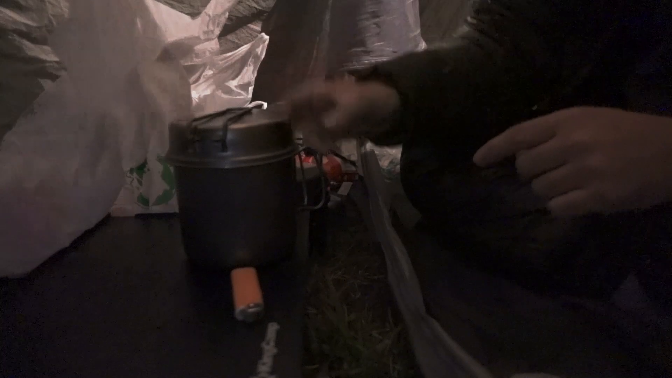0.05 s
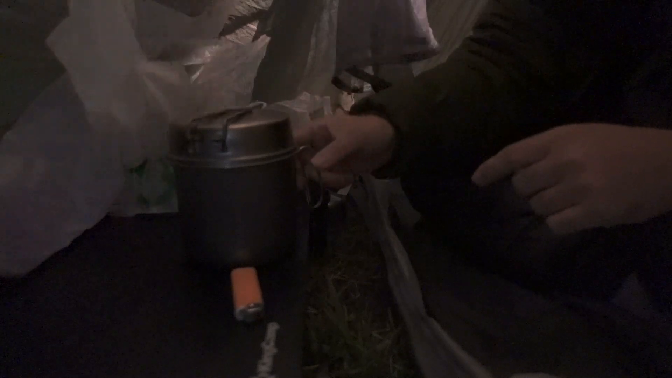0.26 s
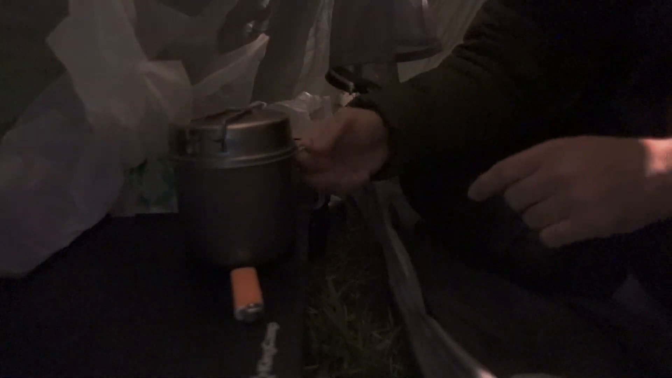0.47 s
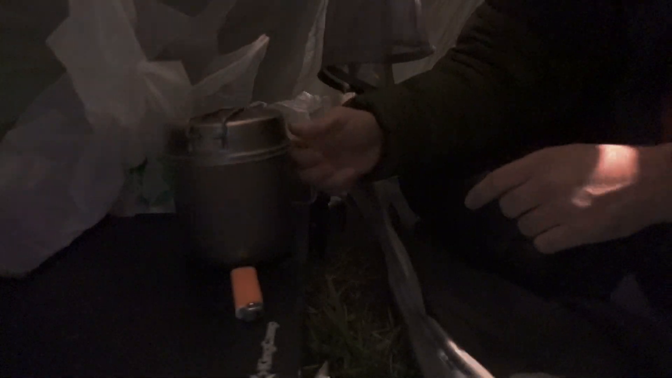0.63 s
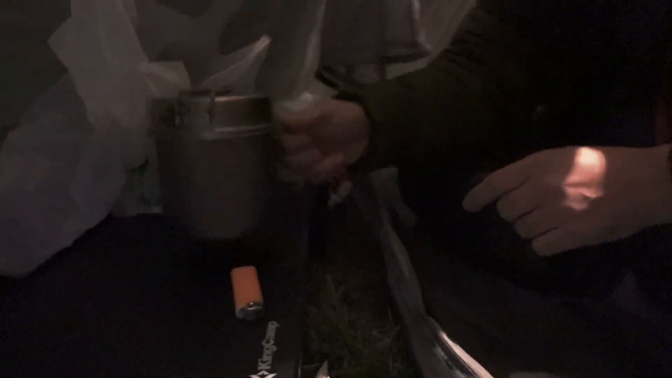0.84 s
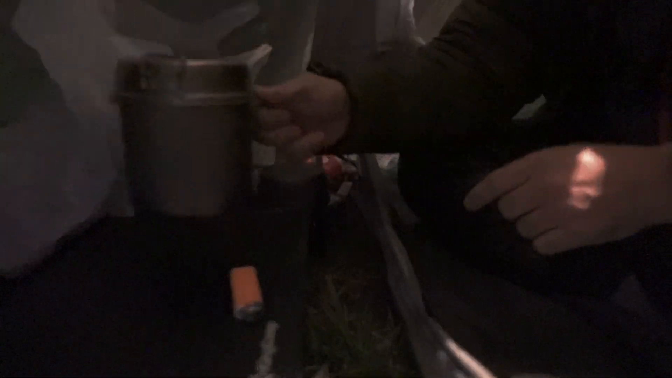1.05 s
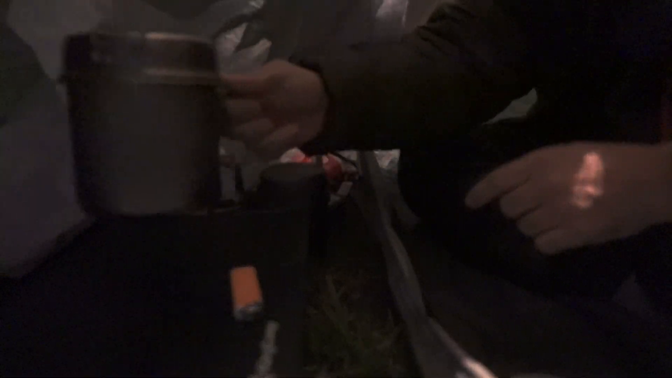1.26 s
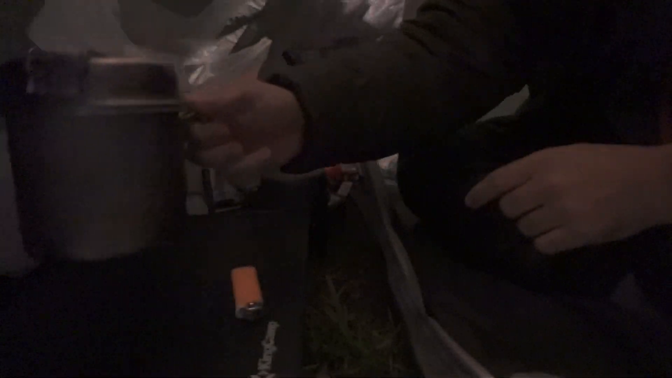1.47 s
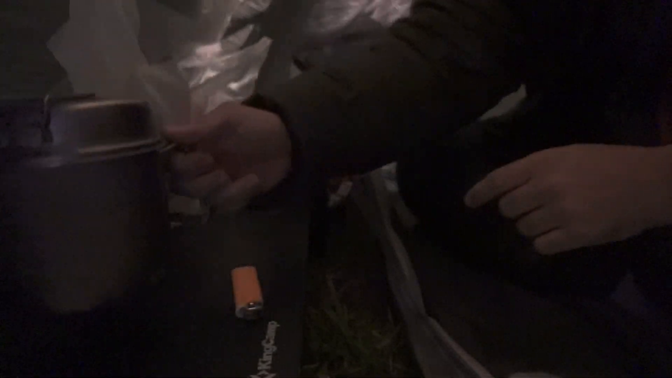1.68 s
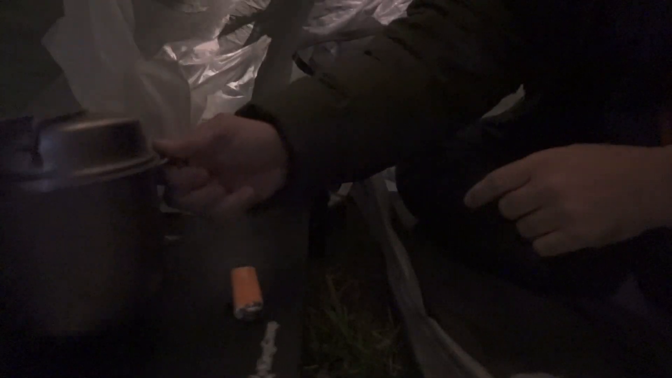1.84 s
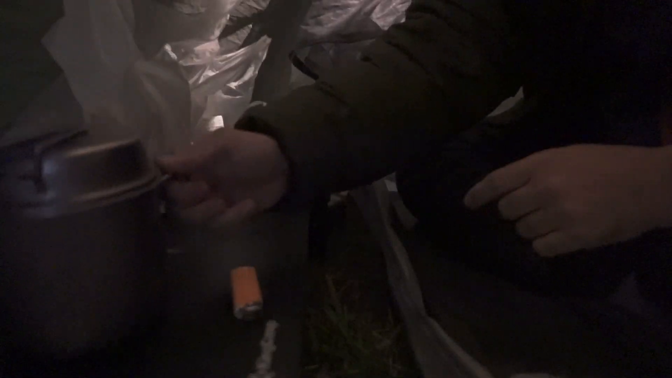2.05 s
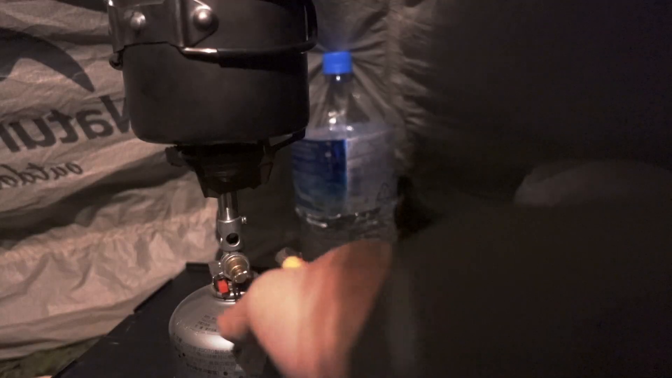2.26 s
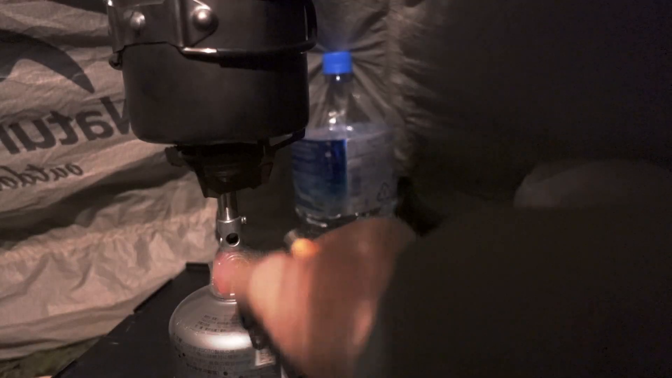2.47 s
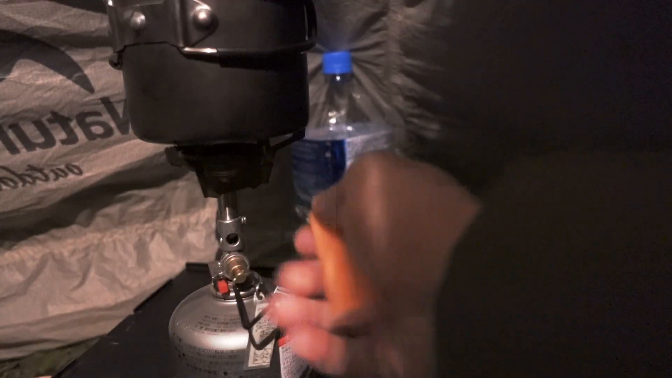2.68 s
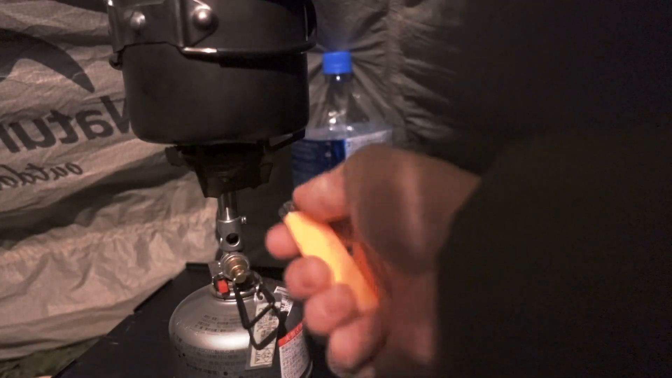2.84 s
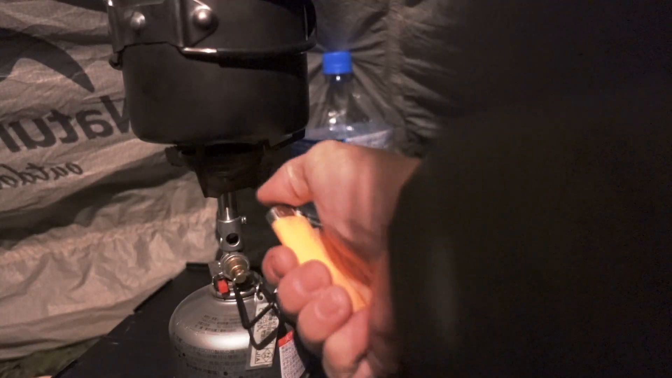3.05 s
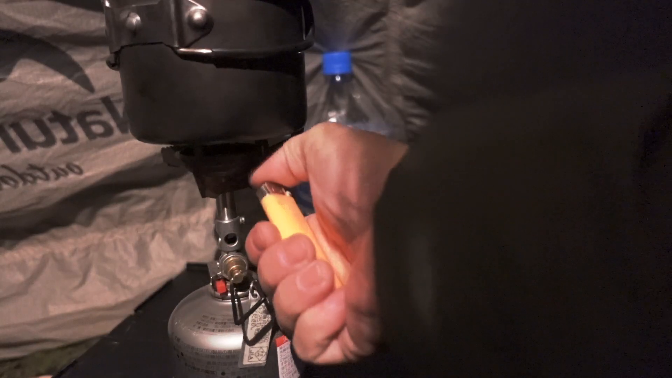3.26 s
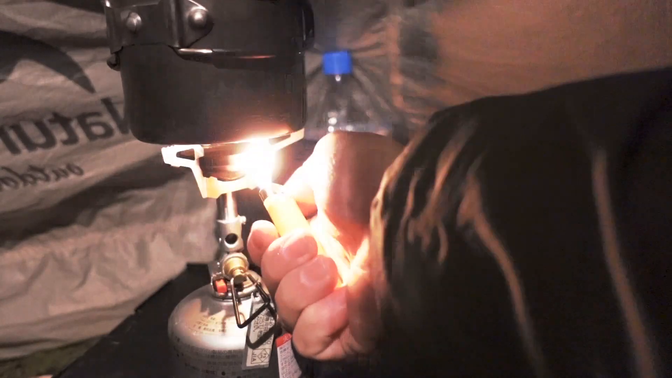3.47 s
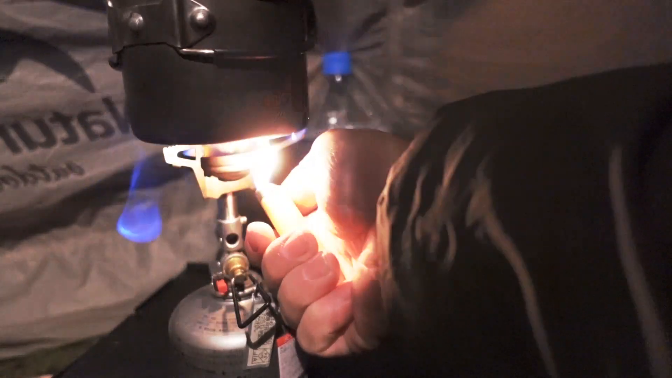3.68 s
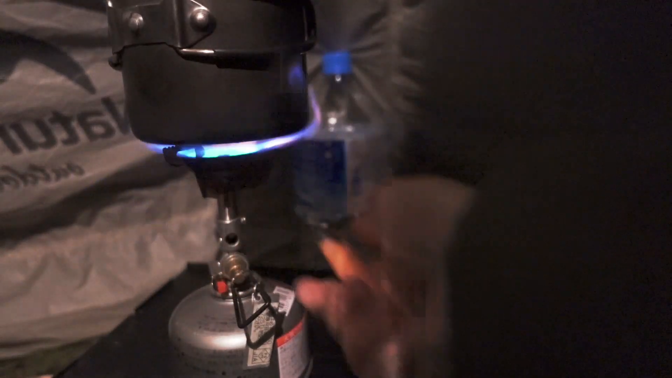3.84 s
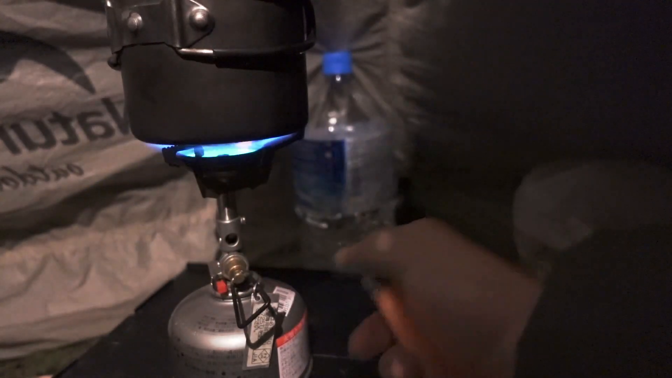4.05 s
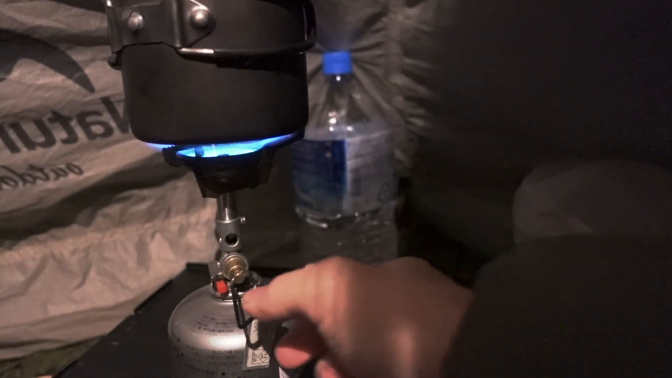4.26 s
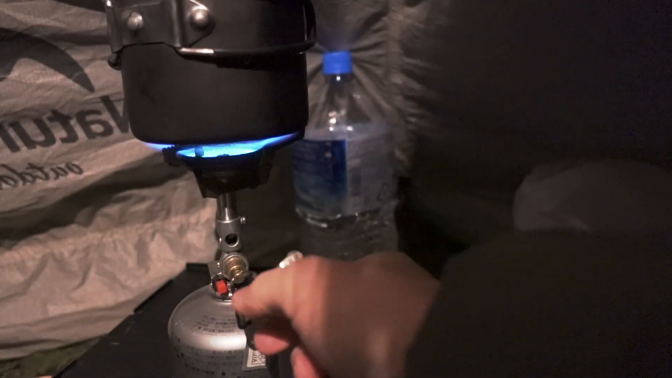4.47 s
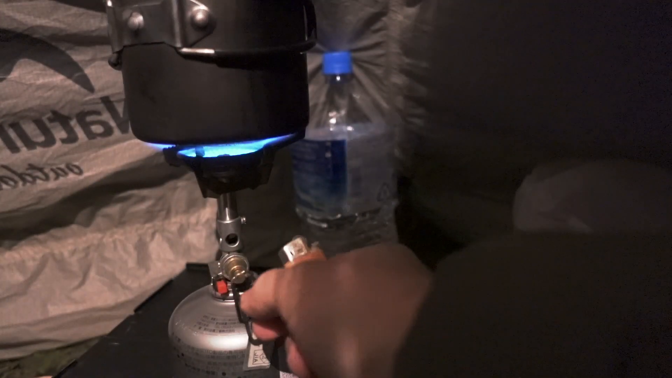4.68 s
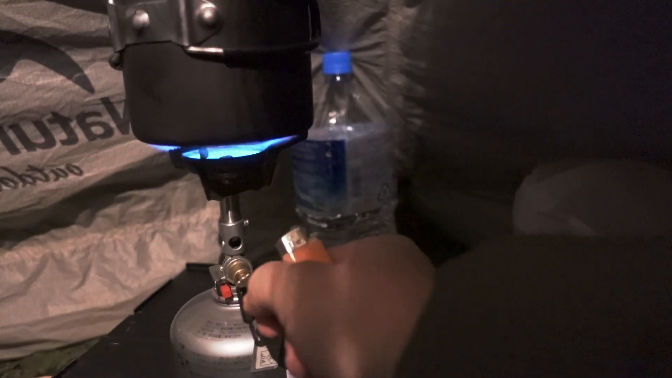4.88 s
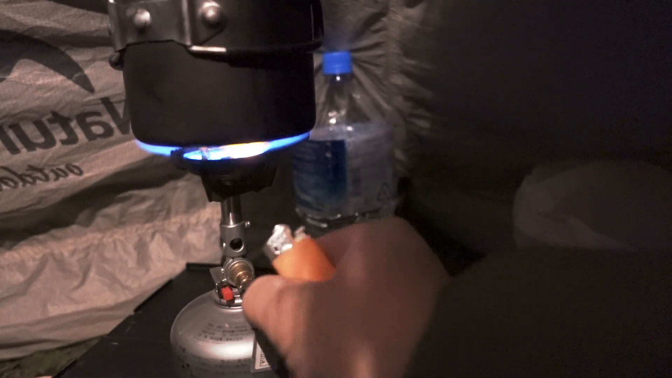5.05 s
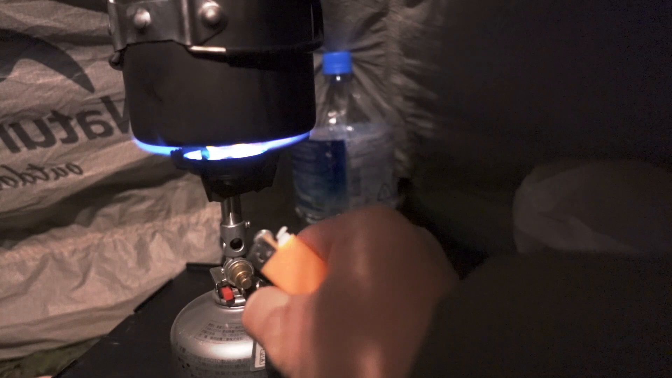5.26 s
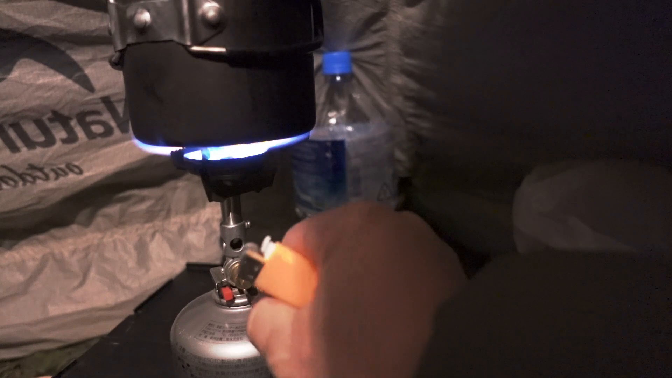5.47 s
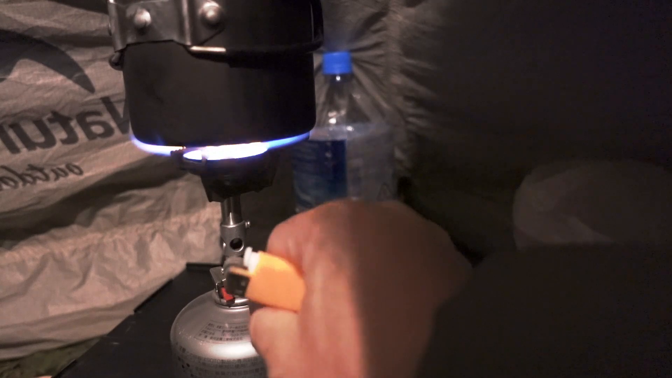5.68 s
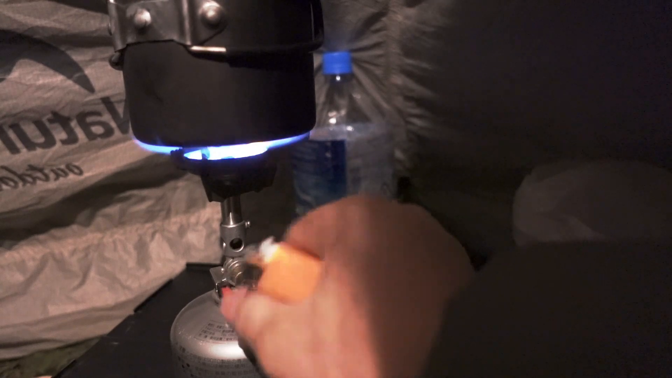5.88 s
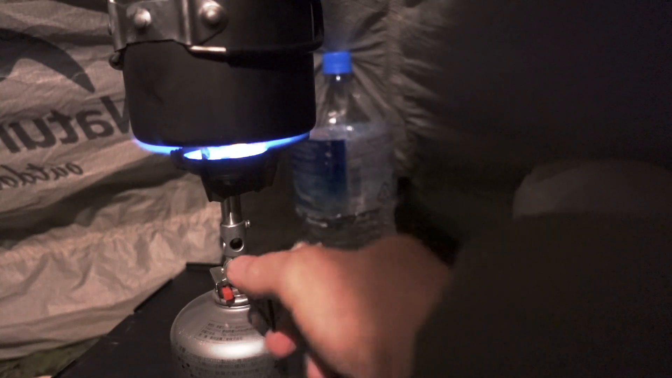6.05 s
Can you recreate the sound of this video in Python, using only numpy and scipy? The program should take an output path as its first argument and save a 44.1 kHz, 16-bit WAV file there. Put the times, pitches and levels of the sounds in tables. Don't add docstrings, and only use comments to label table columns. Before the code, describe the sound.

Pot dragged, lifted and knocked down in a tent, then close by a camp stove hisses, is lit with soft low pops, and its key grinds.

```python
import sys
import numpy as np
from scipy import signal
from scipy.fft import irfft
from scipy.io import wavfile
from scipy.ndimage import uniform_filter1d, map_coordinates

SR = 44100
rng = np.random.default_rng(int(sys.argv[2]) if len(sys.argv) > 2 else 0)


def level_to_linear(level):
    exponent = np.asarray(level, float) / 20
    return 10 ** exponent


def store_wav(level_fs):
    pcm = np.round(np.clip(np.atleast_2d(level_fs), -1, 1) * 32767)
    wavfile.write(sys.argv[1], SR, pcm.T.astype(np.int16))


N = 269892
TIME = np.arange(N) / SR
NEAR_S = 2.13
LAND_S = 2.0792

# time in seconds, level in dB.
AIR_LEVEL = [(0, -45), (1.9, -43.5), (2.27, -36.5), (2.86, -35), (5.9, -35), (6.12, -32)]
# frequency in Hz, level in dB per Hz.
RUMBLE_COLOURS = [
    [(20, -53), (35, -37), (60, -12.5), (120, 0.5), (213, 0), (300, -0.5), (420, -11), (500, -6.5),
     (650, -13.5), (800, -22), (1100, -37), (2000, -100)],
    [(15, -94), (25, -57), (32, -57), (45, -30.5), (116, -7.5), (186, 0), (241, -4), (308, -14),
     (433, -14.5), (579, -16), (638, -15.5), (1200, -39), (1560, -58), (2640, -120)],
]
WASH_DB = [2.5, -1.5]
# frequency in Hz, level in dB per Hz.
STILL_COLOURS = [
    [(470, -23), (800, -5), (1840, 1.5), (2630, -3.5), (3020, -9), (8420, -5), (15300, -13), (16500, -32)],
    [(530, -35), (900, -7.5), (1030, -3), (1740, -0.5), (2060, -5.5), (2270, -3.5), (15100, -13),
     (16500, -26)],
]
STILL_DB = [-53.5, -52.5]
# frequency in Hz, side minus mid in dB.
RUMBLE_SIDE = [(60, -34), (150, -34.5), (380, -11), (950, -4.5), (2380, 33), (5980, -1), (15000, -3)]
# start in seconds, length in seconds, share in dB, rise and fall in seconds.
HAND_SHADE = (4.3, .5, -7, .3, .03)
# centre in seconds, length in seconds, level in dB, pitch in Hz.
HOLLOWS = [(0.84, 0.42, -48.5, 1150), (5.008, 0.047, -47, 4600), (0.901, 0.13, -37, 5204),
           (1.169, 0.2, -31.5, 9350), (1.55, 0.45, -50, 1325), (2.912, 0.065, -45, 3560),
           (3.686, .024, -39, 5600), (4.36, .2, -51, 8440), (4.48, 0.24, -55, 1570), (4.48, .24, -60, 2600),
           (5.853, 0.53, -53, 1380), (5.62, .7, -56, 3800), (5.3, .4, -60, 2550)]
# centre in seconds, length in seconds, level
# in dB, pitch in Hz.
BRUSHES = [(0.464, 0.08, -49, 700), (0.964, 0.047, -34.5, 6440), (1.124, 0.037, -39, 3400),
           (1.304, .024, -35, 8000), (1.341, .03, -36, 6500), (1.527, .012, -36, 12000),
           (1.203, 0.025, -28.5, 4900), (1.466, 0.013, -28, 4600), (1.468, 0.031, -23.5, 8450),
           (2.185, 0.03, -53, 5600), (2.092, .036, -36, 11500), (2.14, 0.066, -50, 9500),
           (2.922, .05, -48, 7840), (3.272, 0.045, -44, 6100), (3.095, 0.026, -50, 8000),
           (3.242, .03, -47, 8000), (3.93, 0.43, -50, 9000), (4.08, 0.52, -61, 6940),
           (3.5, 0.057, -37, 9000), (3.587, 0.019, -35, 5000), (3.686, 0.049, -38, 5600),
           (3.683, 0.03, -37, 1270), (3.684, 0.015, -29.5, 640), (3.698, 0.06, -41, 8900)]
# time in seconds, level in dB.
RUSTLE_LEVEL = [(.89, -43.5), (1.0, -35.5), (1.088, -34), (1.097, -27), (1.208, -31.5), (1.225, -36),
                (1.36, -37.5), (1.495, -43), (1.56, -42), (1.95, -65.5)]
# frequency in Hz, level in dB per Hz.
CLOTH_COLOUR = [(530, -15.5), (900, -6), (1300, -5.5), (1910, -7), (5380, -0.5), (7290, 5), (9530, 4.5),
                (15100, -4), (15900, -8), (16500, -16)]
# time in seconds, peak in dB, ring in Hz, 60 dB decay in seconds.
LATCH_SNAPS = [
    (0.3487, -8, 5000, 0.11),
    (0.351, -4, 9400, 0.12),
    (4.798, -29, 7900, 0.094),
    (4.9141, -4, 8600, 0.035),
    (4.9175, -11, 8400, 0.044),
]
# time in seconds, peak in dB, ring in Hz, dull part in dB.
LIFT_TICKS = [(0.9547, -27, 6640, -28), (0.9978, -12.5, 7850, -27), (1.0066, -15, 7400, -17),
              (1.0261, -6.5, 7050, -16), (1.046, -13, 9100, -25), (1.0956, -15, 7000, -19),
              (1.28, -25, 7700, -31), (1.298, -10.5, 9400, -14), (1.302, -23, 7500, -20),
              (1.3066, -14.5, 5940, -22), (1.33, -15.5, 6010, -22), (1.334, -25, 8000, -25),
              (1.339, -18, 6860, -15), (1.3445, -18, 5500, -12), (1.352, -21, 6400, -25),
              (1.415, -25, 6080, -20), (1.4477, -23, 7560, -17), (1.3779, -10, 7940, -21),
              (1.3797, -5, 8400, -14), (1.4632, -14, 4570, -35), (1.512, -21, 6190, -31),
              (1.529, -13.5, 5100, -39), (1.529, -14, 9100, -39), (1.5421, -9, 6300, -39),
              (1.7875, -18, 5660, -12.5)]
# time in seconds, peak in dB, ring in Hz, dull part in dB,
# top in dB.
HAND_TICKS = [(2.508, -38, 2660, -1, -21), (2.895, -33, 4000, -20, -25), (2.9043, -26.5, 3900, -12, -14),
              (2.909, -30, 3330, -10, -22), (2.917, -35, 3250, -9, -28), (2.925, -30, 4500, -8, -14),
              (3.089, -35, 6500, -15, -5), (3.2355, -37, 6060, -6, -3), (3.2645, -32, 6650, -1, -16),
              (3.271, -35, 5900, 0, -18), (3.4025, -36, 2600, -4, -30), (3.409, -26.5, 3100, -9, -19),
              (3.417, -29.5, 3200, -15, -29), (3.4518, -34, 6160, -22, -23), (3.4578, -21, 8010, -30, -21),
              (3.4648, -19, 8290, -20, -14), (3.47, -16, 8060, -19, -18), (3.477, -11, 7400, -22, -8),
              (3.481, -4.5, 8550, -18, -6), (3.5675, -16.5, 2640, 2, -24), (3.5832, -19.5, 2850, 3, -14),
              (3.6752, -22.5, 4500, -27, -27), (3.792, -28, 5000, -3, -8), (4.77, -37, 7570, -20, -21),
              (4.8411, -31, 8120, -12, -15), (4.998, -22, 7560, -10, -17), (5.012, -24, 7400, -12, -15),
              (5.045, -33, 4200, -8, -7), (5.8152, -38, 5080, -23, -28)]
# time in seconds, peak
# in dB, ring in Hz, dull part in dB, # top in dB.
CRACKLES = [(1.119, -14, 5600, -10, -14), (1.1315, -18, 9800, -22, 2), (1.165, -17, 9400, -25, -10),
            (1.194, -17, 7490, -12, -12), (1.6067, -31, 3390, -10, -20), (1.905, -43, 8500, -25, -10),
            (1.941, -42, 8000, -25, -12), (1.9853, -40, 7900, -25, -10), (2.0853, -19, 6000, -11, -12),
            (2.0985, -22, 6500, -10, -8), (2.1809, -34, 6800, -4, -10), (3.508, -31, 9000, -25, -14),
            (4.8756, -23, 8100, -12, -11), (4.9679, -27, 3920, -10, -6), (4.994, -29, 4700, -14, -14),
            (5.037, -34, 9000, -20, -8), (5.056, -28, 8300, -20, -8)]
# time in seconds, level in dB, pitch in Hz, 60 dB decay in seconds.
PINGS = [(2.181, -43, 6800, .03), (2.184, -43, 2730, .05), (2.19, -47, 5600, .04), (4.771, -43, 7570, .12),
         (4.798, -33, 7590, .06), (4.9135, -18, 7170, .04), (4.9142, -23, 9300, .03),
         (5.011, -33, 7600, .05), (5.8152, -39, 5080, .04), (4.914, -25, 545, .06),
         (3.4095, -38, 3100, .03), (3.418, -38, 3250, .035), (2.908, -38, 3330, .03)]
# start in seconds, length in seconds, level in dB.
PULLS = [
    (-.1, 0.98, -26.5),
    (-.1, 0.46, -27.5),
    (0.471, 0.472, -26),
]
# frequency in Hz, level in dB per Hz.
POT_COLOUR = [(530, -78), (900, -30.5), (1150, -29.5), (1540, -25.5), (2380, -11), (2820, -12.5),
              (3150, -13.5), (4760, -13), (5930, -1.5), (8540, -18.5), (14900, -25), (15900, -26),
              (16500, -65)]
# frequency in Hz, width in Hz, lift in dB, lift in dB as the pull slackens.
POT_MODES = [(1150, 120, 2, 8), (2385, 120, 7, 13), (2810, 230, 11.5, 9), (3430, 200, 9, 8),
             (3880, 120, -6, -4), (4500, 120, 2.5, 4), (4900, 130, -8, -8), (5025, 110, 8.5, 5),
             (5340, 110, 5.5, 13), (5600, 130, 4.5, 4), (5873, 100, 8.5, 0), (6160, 180, 5, -4),
             (7050, 220, 5, -5), (7400, 89, 1, -4)]
# time in seconds, pitch ratio.
POT_BEND = [(0, 0.98), (.25, 1.008), (.4, 1), (.65, 1.012), (.86, 1.003), (.93, 0.94)]
# frequency in Hz, level in dB per Hz.
LANDING_COLOUR = [(120, -25), (200, -8), (361, -32), (513, 1), (908, -13), (1200, -11.5), (2080, -11.5),
                  (2240, -15), (3130, -15.5), (4440, -10.5), (7450, -12.5), (13700, -23.5), (16500, -67)]
# frequency in Hz, level in dB, 60 dB decay in seconds.
LANDING_MODES = [(250, 1.5, 0.083), (542, 7, 0.03), (502, -3, 0.16), (700, -2, 0.097), (1220, -32, 0.11),
                 (1554, -7, 0.07), (2280, -10.5, 0.23), (3670, -6, 0.11), (4430, -11, 0.33),
                 (5100, -6, 0.16), (6000, -2, 0.11), (7666, -24, 0.19), (8301, -21, .08)]
# time in seconds, level in dB.
KEY_PRESSURE = [(4.765, -50), (4.81, -41.5), (4.86, -32.5), (4.905, -35.5), (4.925, -33.5), (4.975, -35),
                (5.01, -38), (5.06, -41.5), (5.13, -54)]
# frequency in Hz, level in dB per Hz.
CANISTER_COLOUR = [(210, -42.5), (350, -11), (635, -8.5), (877, -19.5), (1060, -13.5), (1640, -27.5),
                   (3030, -17.5), (3620, -20.5), (3990, -17.5), (7850, -13), (15200, -26), (16500, -67)]
# frequency in Hz, width in Hz, lift in dB.
CANISTER_MODES = [(536, 12, 11), (581, 18, 6), (631, 23, 8), (1015, 20, 12), (1086, 20, 11.5),
                  (1446, 70, 7), (2405, 57, 9.5), (3105, 110, 10), (4030, 63, 12.5), (4600, 53, 14),
                  (6340, 90, 9), (6830, 120, 6), (7570, 100, 6), (8200, 110, 9)]
# frequency in Hz, level in dB per Hz.
WHEEL_COLOUR = [(530, -69), (900, -40), (1480, -25), (2660, -12), (3150, -4.5), (5380, -21.5), (7200, 3),
                (7840, -8), (9880, -1), (12900, -22), (14900, -24), (15900, -20), (16500, -51)]
# time in seconds, peak in dB, pitch in Hz, 60 dB decay in seconds, rough edge in dB.
POPS = [
    (3.5682, -13, 226, 0.041, -22),
    (3.582, -6, 181, 0.047, -20),
    (3.593, -18, 100, 0.066, -40),
    (3.683, 2, 189, 0.03, -27),
]
# time in seconds, level in dB.
GAS_FLOW = [(2.3, -59), (2.4, -57), (2.9, -48), (3.2, -52.5), (3.5, -53), (3.75, -51.5), (3.9, -51),
            (4.15, -52), (4.45, -52.5), (4.77, -55.5), (5.2, -50), (5.4, -50), (5.6, -46.5), (5.85, -48),
            (6.12, -47)]
# frequency in Hz, level in dB per Hz.
JET_COLOURS = [
    [(530, -28), (900, -14), (1230, -31), (2620, -12.5), (6860, -10), (7650, -4), (8330, -8.5),
     (11300, -5.5), (15700, -16), (16500, -32)],
    [(530, -38), (900, -19), (1360, -39), (1590, -23), (2110, -22.5), (5720, -28.5), (8330, -24),
     (15100, -31), (15900, -26), (16500, -54)],
    [(530, -33), (900, -1), (1390, -6), (1740, -10.5), (2960, -11.5), (3780, -4.5), (4430, -5.5),
     (10200, -4), (15500, -17), (16500, -24)],
]
# frequency in Hz, width in Hz, lift in dB.
JET_MODES = [
    [(2640, 140, 12.5), (6160, 150, 11), (7560, 510, 8.5), (9560, 170, 11.5), (10900, 200, 7.5),
     (11500, 130, 11)],
    [(2600, 150, 13), (6400, 400, 14), (7050, 340, 9), (7700, 1100, 8.5), (8200, 260, 11.5),
     (10650, 280, 7), (10800, 2600, 11.5), (12300, 200, 9)],
    [(1460, 200, 8.5), (3740, 330, 8.5), (4700, 120, -1), (7100, 280, 6.5), (8300, 160, 6.5),
     (10200, 250, 5.5), (10700, 150, 5), (2600, 200, 9.5)],
]
# frequency in Hz, side lift in dB.
PAIR_WIDTH = [(60, -5), (200, -1), (400, -4), (5000, 0.5), (8000, 4.5), (16000, 2)]


def evened(x):
    return x / np.sqrt(np.mean(x ** 2) + 1e-20)


def pan(db):
    return level_to_linear([[db / 2], [-db / 2]])


def ramp(start, takes):
    return np.clip((TIME - start) / takes, 0, 1)


def stroke(start, length, db, rise, fall):
    t = TIME - start
    return level_to_linear(db) * np.sin(np.pi / 2 * np.clip(np.minimum(t / rise, (length - t) / fall), 0, 1)) ** 2


def curve(rows):
    s, db = np.transpose(rows)
    inside = (TIME >= s[0]) & (TIME <= s[-1])
    return uniform_filter1d(inside * 1., size=200) * level_to_linear(np.interp(TIME, s, db))


def colour(x, spectrum, modes=()):
    hz = np.fft.rfftfreq(8192, 1 / SR)
    f, level_db = np.transpose(spectrum)
    db = np.interp(np.log(hz + 1), np.log(f + 1), level_db)
    for centre, width, lift_db in modes:
        db = db + lift_db / (1 + (2 * (hz - centre) / width) ** 2)
    log_gain = np.log(level_to_linear(np.maximum(db, -100)))
    phased = np.conj(signal.hilbert(np.r_[log_gain, log_gain[-2:0:-1]]))[:len(hz)]
    taps = irfft(np.exp(phased))[:4096]
    return signal.oaconvolve(x, taps[None], axes=1)[:, :x.shape[1]]


def split(x, hz):
    low = signal.butter(4, hz, fs=SR, output="sos")
    high = signal.butter(4, hz, "high", fs=SR, output="sos")
    return signal.sosfilt(low, x), signal.sosfilt(high, x)


def slips(per_s, spread_db, smooth, side_db, pan_db=0.):
    size = level_to_linear(spread_db * np.minimum(rng.exponential(1, N), 3)) * (rng.random(N) < per_s / SR)
    burst = signal.lfilter([1], [1, -.97], size)
    mid, side = (evened(burst) + smooth) * rng.standard_normal((2, N))
    side = level_to_linear(side_db) * side
    return np.array([mid + side, mid - side]) * pan(pan_db)


def flicker(hz, depth_db):
    slow = signal.sosfiltfilt(signal.butter(2, hz, fs=SR, output="sos"), rng.standard_normal(N))
    return level_to_linear(depth_db * evened(slow))


def bent(x, rows):
    at = np.cumsum(np.interp(TIME, *np.transpose(rows)))
    return np.array([map_coordinates(v, [at], order=3) for v in x])


def patchy(x, depth_db):
    z = signal.stft(x, nperseg=512)[2]
    field = uniform_filter1d(rng.standard_normal(z.shape[1:]), size=5, axis=0)
    field = uniform_filter1d(field, size=14, axis=1)
    return signal.istft(z * level_to_linear(depth_db * evened(field)), nperseg=512)[1][:, :N]


def shaded(x):
    low, high = split(x, hz=3800)
    return low + (1 - stroke(*HAND_SHADE)) * high


def air():
    near = ramp(NEAR_S, takes=0.014)
    mid, side = rng.standard_normal((2, 1, N))
    side = colour(side, RUMBLE_SIDE)
    gusts = np.r_[mid + side, mid - side] * flicker(hz=37.5, depth_db=1.0)
    hush = slips(per_s=3000, spread_db=1.5, smooth=3., side_db=-7)
    level, out = curve(AIR_LEVEL), 0
    places = zip([1 - near, near], RUMBLE_COLOURS, WASH_DB, STILL_COLOURS, STILL_DB)
    for share, rumble, wash_db, still, still_db in places:
        low, wash = split(colour(gusts, rumble), hz=315)
        lumps = level * (low + level_to_linear(wash_db) * wash) / low.std()
        hiss = level_to_linear(still_db) * shaded(evened(colour(hush, still)))
        out = out + share * (lumps + hiss)
    return out


def brushes():
    out = np.zeros((2, N))
    rub = slips(per_s=240, spread_db=-13.0, smooth=2.5, side_db=-9.5)
    run_in = 2000
    for rows, width in [(HOLLOWS, 0.22), (BRUSHES, 1)]:
        for s, length, db, hz in rows:
            a, b = round((s - length / 2) * SR), round((s + length / 2) * SR)
            band = colour(rub[:, a - run_in:b], [(20, -42), (22000, -56)], [(hz, 2 * width * hz, 50)])
            out[:, a:b] += level_to_linear(db) * evened(band[:, run_in:]) * np.hanning(b - a)
    return out


def rustle():
    level = curve(RUSTLE_LEVEL)
    rub = slips(per_s=900, spread_db=3., smooth=1.8, side_db=-6, pan_db=1.5)
    dull, bright = split(colour(rub * flicker(hz=50, depth_db=1.5), CLOTH_COLOUR), hz=4500)
    return level * evened(bright) + level_to_linear(-18.5) * abs(level) ** 0.69 * evened(dull)


def knocks():
    snaps = [(s, db, hz, t60, -20, -13.5) for s, db, hz, t60 in LATCH_SNAPS]
    lift = [(s, db, hz, 0.029, dull_db, -8) for s, db, hz, dull_db in LIFT_TICKS]
    hands = [(s, db, hz, 0.025, dull_db, top_db)
             for rows in (HAND_TICKS, CRACKLES) for s, db, hz, dull_db, top_db in rows]
    return snaps + lift + hands


def ticks():
    length = 6000
    out, t = np.zeros((2, N + length)), np.arange(length) / SR
    for s, db, hz, t60, dull_db, top_db in knocks():
        ring = level_to_linear(-60 * t / max(t60, .005))
        snap, scatter = level_to_linear(0.5 - 60 * t / 0.0083), level_to_linear(-19 - 60 * t / 0.071)
        fade = np.minimum(t / 0.00031, 1) * (ring + snap + scatter)
        mid, side = rng.standard_normal((2, length))
        crack = np.array([mid + 0.23 * side, mid - 0.33 * side])
        tone = [(500, -60), (0.48 * hz, -18), (0.71 * hz, -4), (hz, -3),
                (min(1.45 * hz, 12000), .7 * top_db - 3), (13000, top_db), (15800, top_db - 6),
                (16100, top_db - 42)]
        bright = colour(crack, tone, [(hz, 0.16 * hz, 7)])
        dull = colour(crack, [(300, -104), (700, -4.5), (2400, -2.0), (3600, -7.0), (6000, -53)])
        knock = fade * (evened(bright) + level_to_linear(dull_db) * evened(dull))
        placed = knock / abs(knock).max() * pan(2.5 if s < NEAR_S else -2.)
        out[:, round(s * SR):][:, :length] += level_to_linear(db) * placed
    return out[:, :N]


def pings():
    out, t = np.zeros(N), np.arange(4000) / SR
    for s, db, hz, t60 in PINGS:
        fade = level_to_linear(db - 60 * t / t60) * np.minimum(t / .0006, 1)
        out[round(s * SR):][:4000] += fade * np.sin(2 * np.pi * hz * t)
    return out * pan(1.0)


def drag():
    rub = slips(per_s=1800, spread_db=2.0, smooth=3.0, side_db=-15.5, pan_db=-3.6)
    rub = rub * flicker(hz=63, depth_db=0.5)
    slack = ramp(0.82, takes=0.057)
    firm = evened(colour(rub, POT_COLOUR, [(f, w, db) for f, w, db, _ in POT_MODES]))
    loose = evened(colour(rub, POT_COLOUR, [(f, w, db) for f, w, _, db in POT_MODES]))
    pull = np.linalg.norm([stroke(*row, rise=0.053, fall=0.07) for row in PULLS], axis=0)
    return pull * bent((1 - slack) * firm + slack * loose, POT_BEND)


def landing():
    t = np.arange(round((NEAR_S - LAND_S) * SR)) / SR
    rough = slips(per_s=350, spread_db=6.0, smooth=3.5, side_db=-7, pan_db=3.0)[:, :len(t)]
    crack = evened(colour(rough, LANDING_COLOUR)) * (level_to_linear(-60 * t / 0.015) + level_to_linear(-2 - 60 * t / 0.19))
    walls = sum(level_to_linear(db - 60 * t / t60) * np.sin(2 * np.pi * hz * t) for hz, db, t60 in LANDING_MODES)
    blow = (1 - t / 0.00023) * np.exp(-t / 0.00039)
    hit = crack + level_to_linear(-5.0) * walls + level_to_linear(-1) * blow
    gate = np.minimum(t / .0001, 1) * np.minimum((t[-1] - t) / 0.0016, 1)
    out = np.zeros((2, N))
    out[:, round(LAND_S * SR):][:, :len(t)] = level_to_linear(-19.5) * hit * gate
    return out


def key():
    rub = slips(per_s=700, spread_db=3., smooth=1.6, side_db=-12) * flicker(hz=35, depth_db=1.5)
    body, bright = split(colour(rub, CANISTER_COLOUR, CANISTER_MODES), hz=1840)
    wakes = ramp(4.78, takes=0.068)
    body_db = 4.5 - 45 * np.maximum(TIME - 4.97, 0)
    ring = wakes * level_to_linear(body_db) * evened(body) * pan(2.4)
    return curve(KEY_PRESSURE) * (evened(bright) + ring)


def flint():
    rasp = slips(per_s=900, spread_db=3., smooth=1., side_db=-8)
    t = TIME - 3.479
    jolt_db = 5.5 * np.minimum(abs(t) / 0.0099, 1)
    away_db = np.maximum(-713 * t, 798 * t)
    return level_to_linear(-13 - jolt_db - away_db) * evened(colour(rasp, WHEEL_COLOUR))


def pops():
    out, t = np.zeros((2, N)), np.arange(9000) / SR
    rough = slips(per_s=230, spread_db=-3.0, smooth=0.36, side_db=-10.0)
    edge = evened(colour(rough, [(150, -11), (450, 9), (1500, -22.5), (3000, -19), (6000, -55)]))
    for s, db, hz, t60, edge_db in POPS:
        at = slice(round(s * SR), round(s * SR) + len(t))
        swell = level_to_linear(db - 60 * (t / t60) ** 1.36) * np.minimum(t / 0.0033, 1)
        push = swell * np.sin(2 * np.pi * hz * t * (1 - 1.5 * np.minimum(t, .1)))
        out[:, at] += split(push, hz=.6 * hz)[1] * pan(0.7)
        out[:, at] += level_to_linear(edge_db - 60 * t / 0.057) * np.minimum(t / 0.00041, 1) * edge[:, at]
    return split(out, hz=55)[1]


def gas():
    lit, wide = ramp(3.73, takes=0.12), ramp(4.9, takes=0.7)
    jet, out = slips(per_s=4000, spread_db=1.5, smooth=4., side_db=-9), 0
    for share, spectrum, modes in zip([1 - lit, lit - wide, wide], JET_COLOURS, JET_MODES):
        hiss = colour(jet, spectrum, modes)
        out = out + share * hiss / split(hiss, hz=5000)[1].std()
    return curve(GAS_FLOW) * flicker(hz=4.1, depth_db=3.0) * out


def scene():
    handled = patchy(drag() + rustle() + gas() + key() + flint(), depth_db=1.5)
    soft = air() + handled + brushes() + pops()
    edge = signal.firwin(401, 15900, window=("kaiser", 8), fs=SR)
    soft = signal.oaconvolve(soft, edge[None], "same")
    return soft + ticks() + pings() + split(landing(), hz=150)[1]


def top_cut(x):
    return signal.sosfilt(signal.butter(12, 16620, fs=SR, output="sos"), x)


def record(dry):
    mid, side = dry.mean(0), colour((dry[:1] - dry[1:]) / 2, PAIR_WIDTH)[0]
    power_db = 10 * np.log10(abs(uniform_filter1d(mid ** 2, size=300)) + 1e-12)
    fall = TIME * 89.0
    held_db = np.maximum.accumulate(power_db + fall) - fall
    over_db = np.maximum(held_db + 21.0, 0)
    late_db = np.r_[np.zeros(500), uniform_filter1d(over_db, size=400)][:N]
    ducked = np.array([mid + side, mid - side]) / level_to_linear(0.36 * late_db)
    ceiling = .8
    return top_cut(ceiling * np.tanh(ducked / ceiling))


dry = scene()
out = record(dry)
store_wav(out)
```